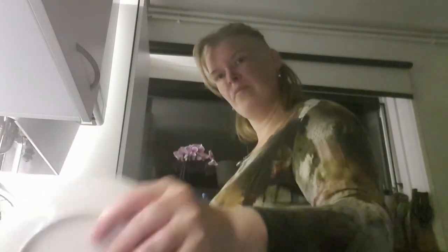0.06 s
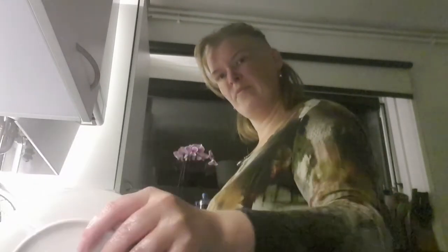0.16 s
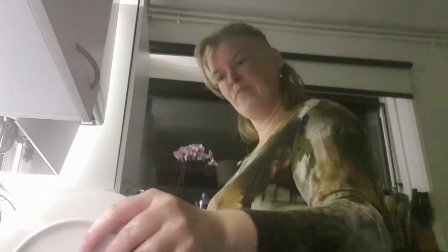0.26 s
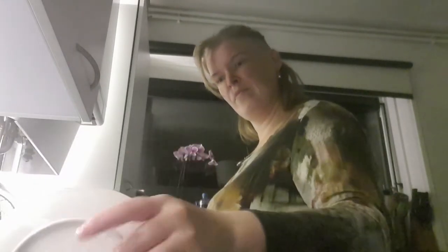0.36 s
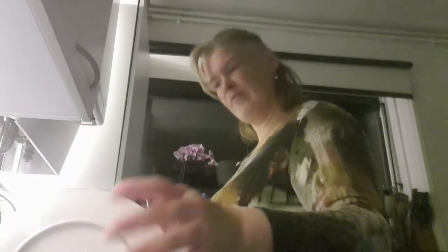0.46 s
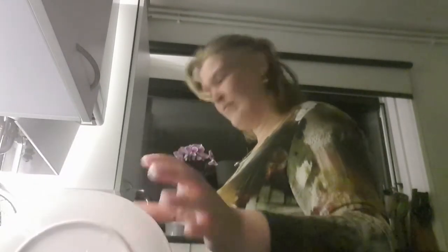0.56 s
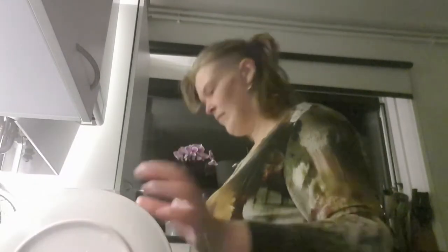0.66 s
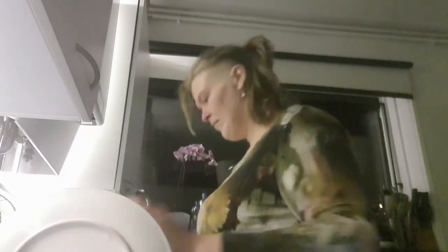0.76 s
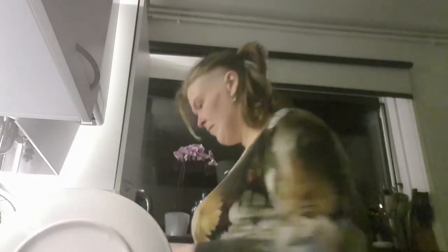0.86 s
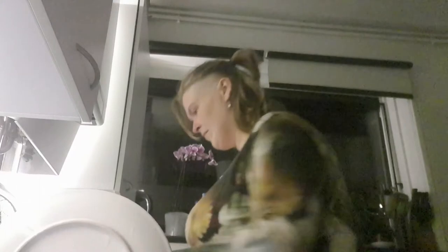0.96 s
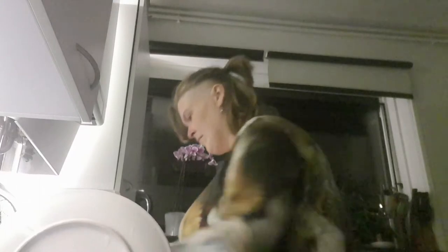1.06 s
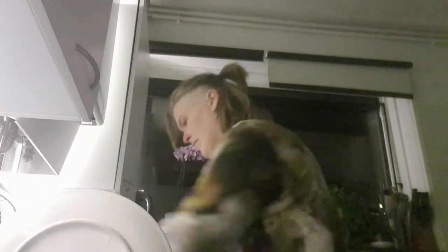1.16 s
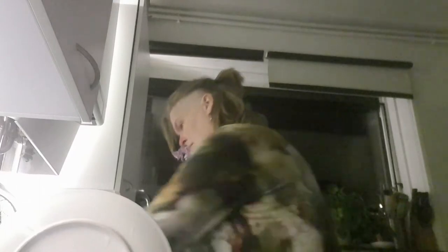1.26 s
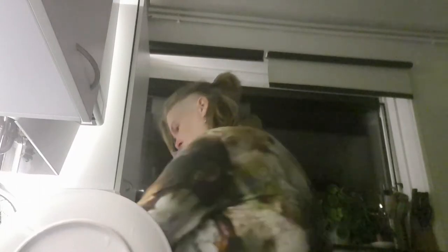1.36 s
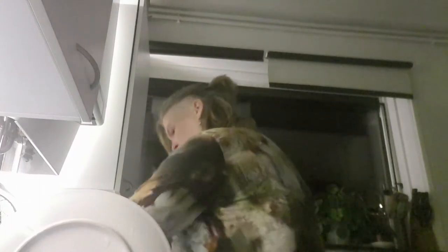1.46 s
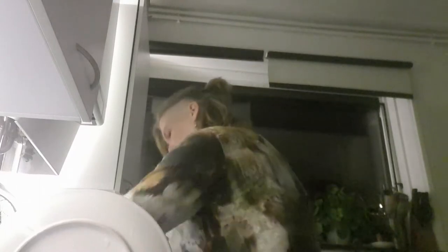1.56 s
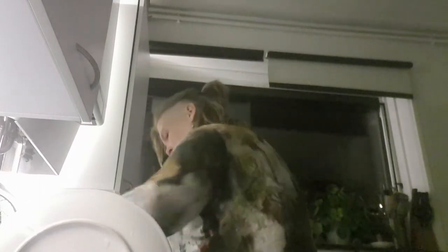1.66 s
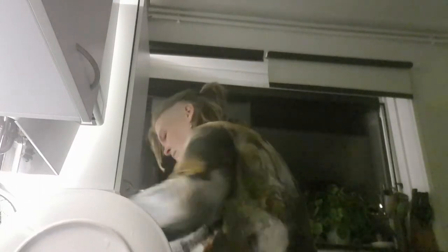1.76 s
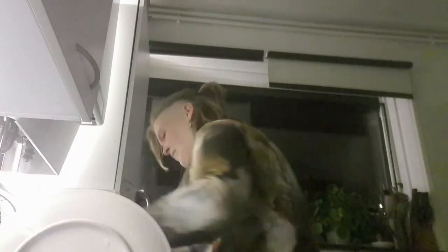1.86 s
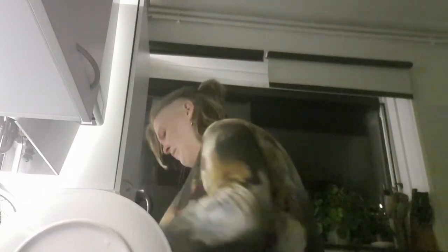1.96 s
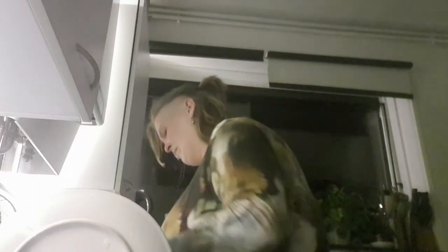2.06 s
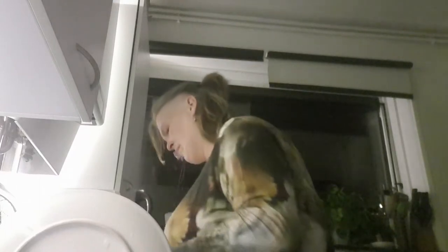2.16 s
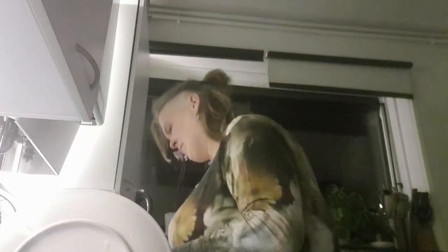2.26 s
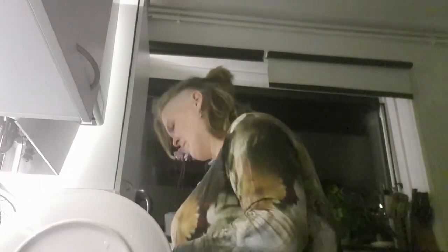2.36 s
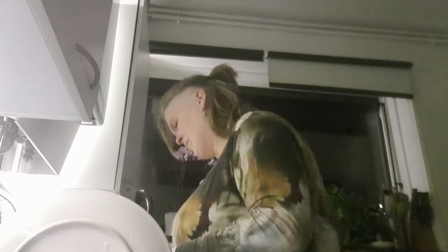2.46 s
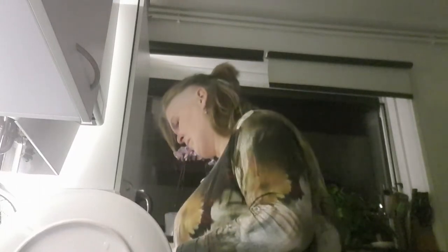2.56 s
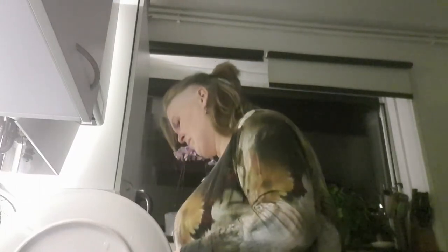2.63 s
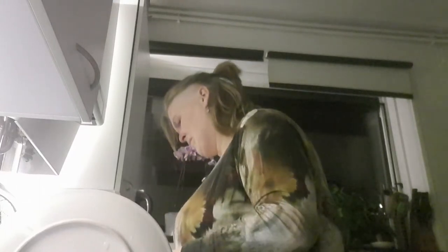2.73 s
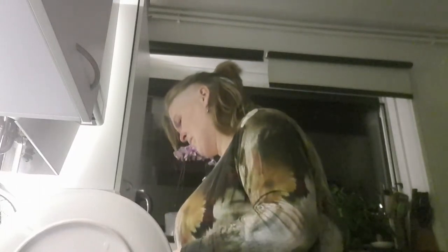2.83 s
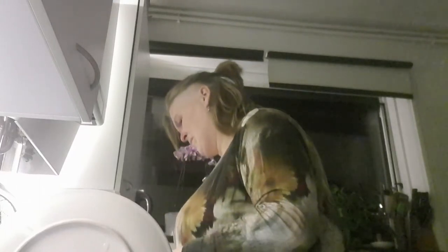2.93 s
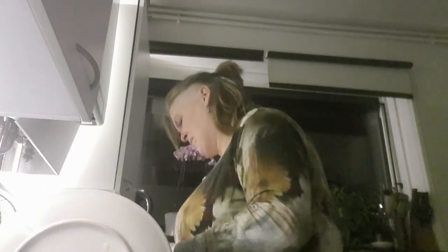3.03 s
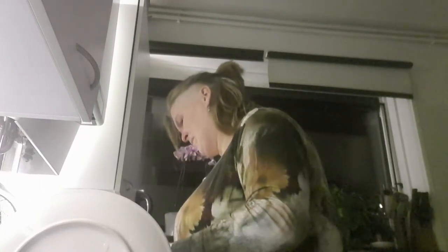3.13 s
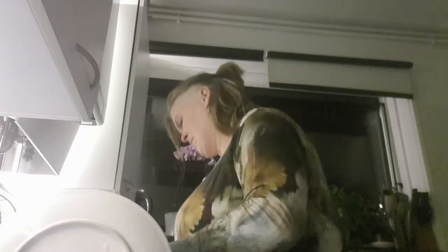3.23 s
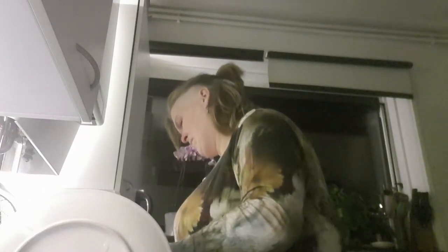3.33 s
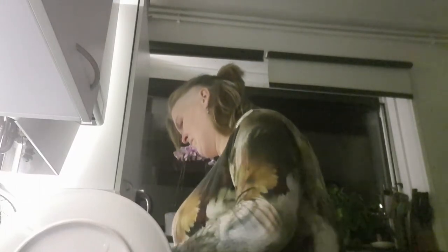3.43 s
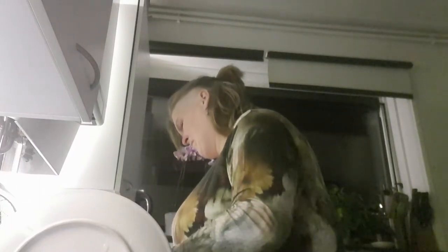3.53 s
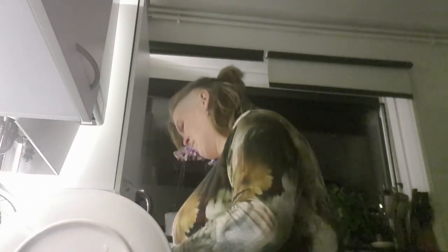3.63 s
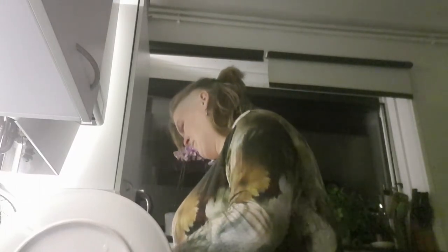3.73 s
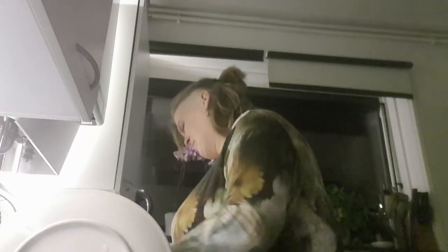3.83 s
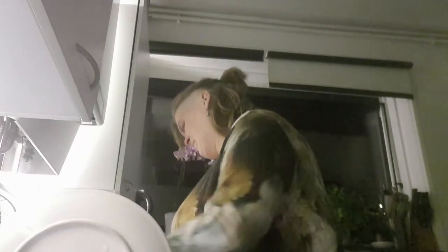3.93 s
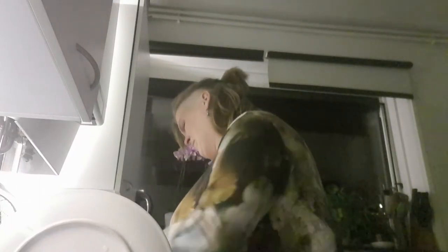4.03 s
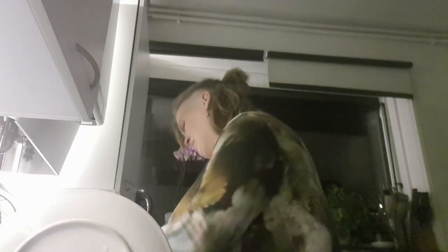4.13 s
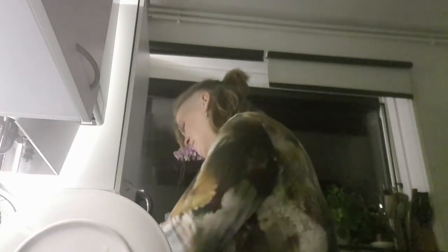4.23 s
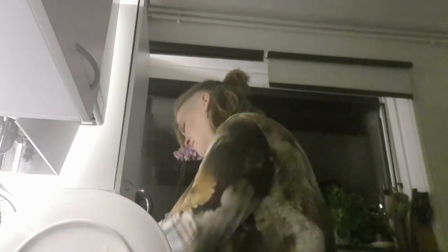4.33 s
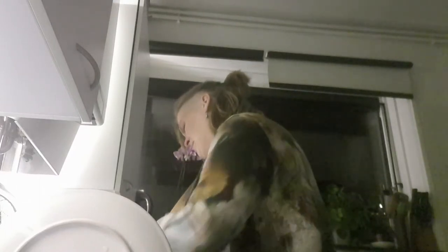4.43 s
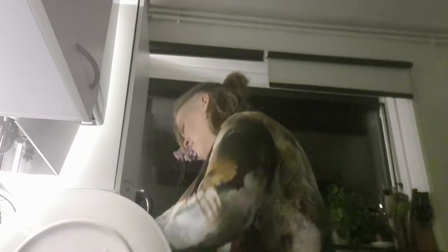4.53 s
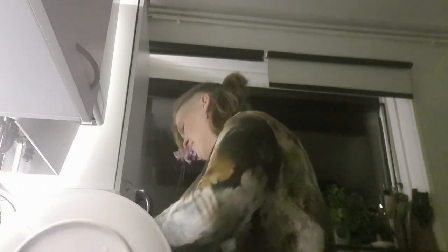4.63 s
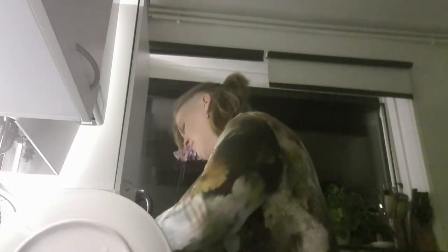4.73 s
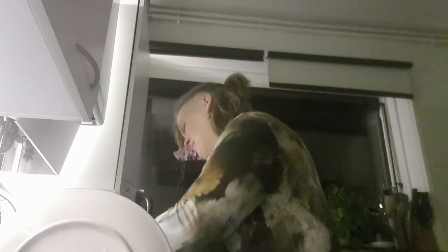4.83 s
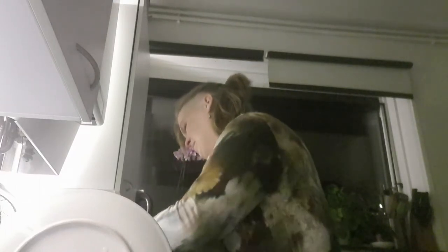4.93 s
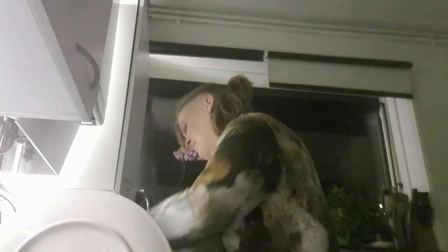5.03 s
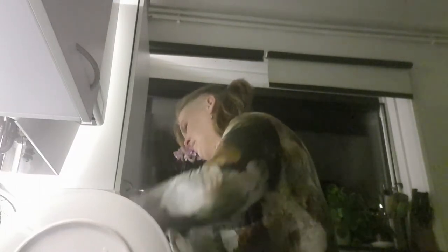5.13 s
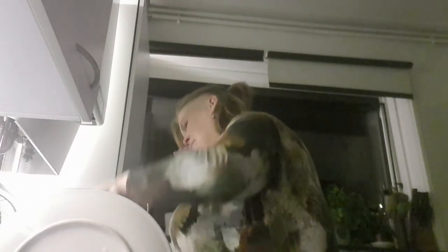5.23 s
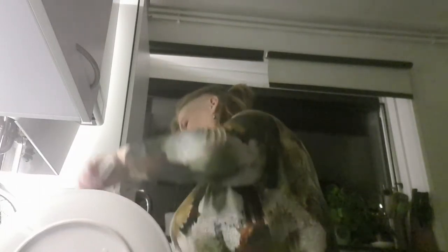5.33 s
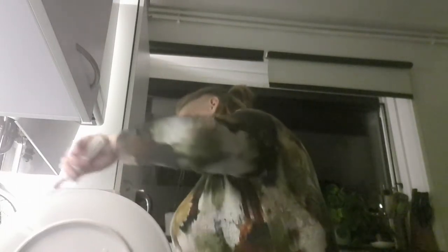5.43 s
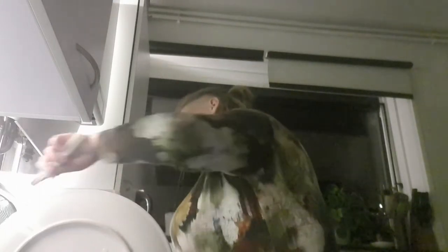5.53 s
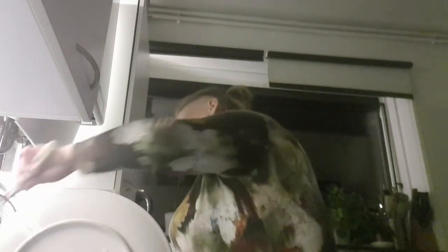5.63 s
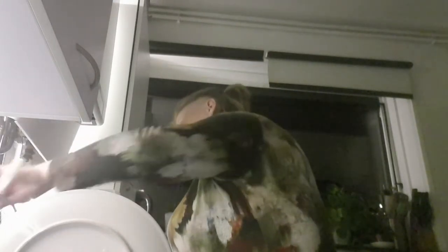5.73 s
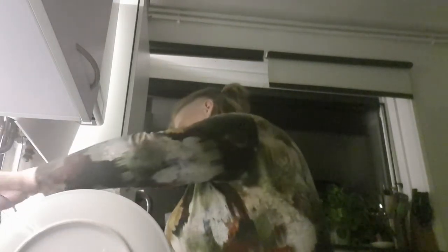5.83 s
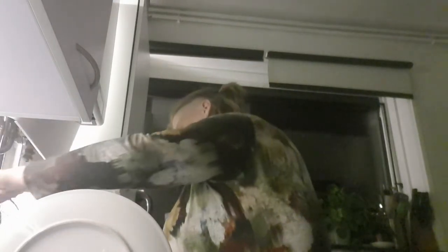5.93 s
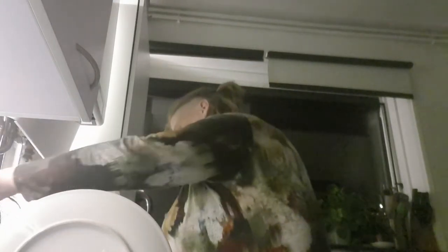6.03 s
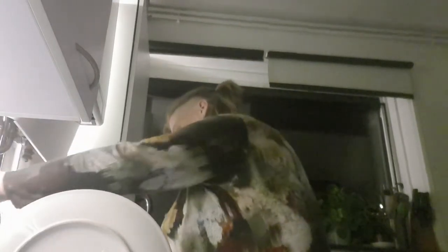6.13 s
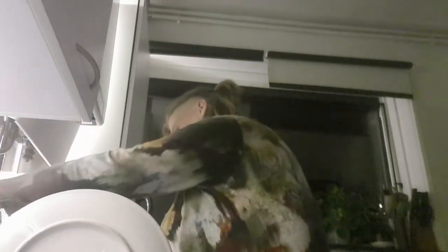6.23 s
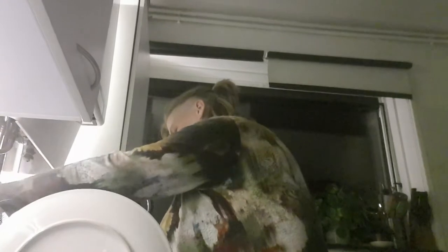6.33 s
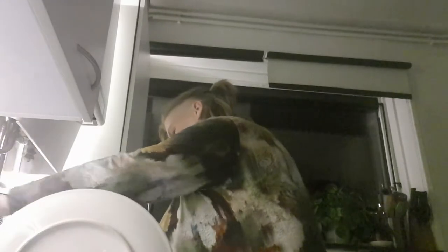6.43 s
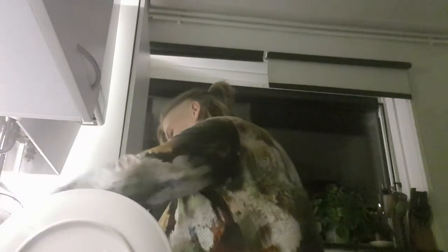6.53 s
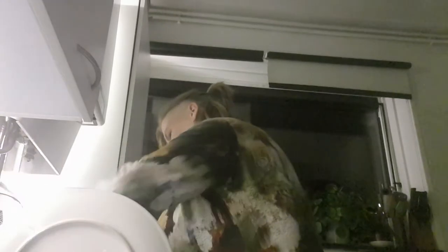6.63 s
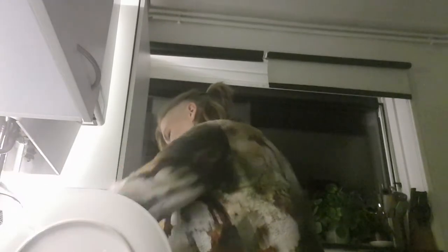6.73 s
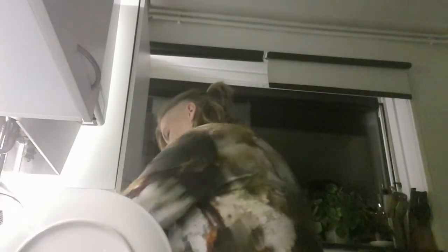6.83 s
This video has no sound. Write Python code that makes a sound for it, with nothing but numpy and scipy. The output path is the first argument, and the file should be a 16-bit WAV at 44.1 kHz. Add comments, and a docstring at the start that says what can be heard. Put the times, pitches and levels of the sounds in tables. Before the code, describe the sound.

A plate clacks into a drying rack, hands slosh and knock dishes in a steel sink, then cutlery clatters into a basket.

```python
"""A plate clacks into a drying rack close by, and the rack thumps and sways in a small, hard-walled kitchen.
Then hands slosh and splash in a steel sink: droplets spray, trapped air glugs and foam fizzes, while
dishes knock the basin into ringing, boom over its floor and groan as they stick and slip.
Near the end a piece of cutlery clashes into the rack's hollow basket and one more utensil clinks."""
import sys
import numpy as np
from scipy import signal
from scipy.fft import rfft, irfft, next_fast_len
from scipy.io import wavfile
from scipy.ndimage import uniform_filter1d

SR = 44100
rng = np.random.default_rng(int(sys.argv[2]) if len(sys.argv) > 2 else 0)


def generate_wav(sig):
    """Save sig (samples, or channels by samples) to the path in sys.argv[1] as 16-bit PCM at SR."""
    pcm = np.round(np.clip(np.atleast_2d(sig).T, -1, 1) * 32767).astype(np.int16)
    wavfile.write(sys.argv[1], SR, pcm)


N = 303849
HANDS_IN_S, HANDS_OUT_S = 1.33, 5.6  # the hands are in the sink between these times
STROKE_RISE_S, STROKE_FALL_S = 0.015, 0.018  # a stroke gathers speed; the water settles

# left-right likeness of diffuse sound: f/Hz, correlation
STEREO_LIKENESS = [(50, 0.98), (300, 0.94), (600, 0.51), (1000, 0.12), (1800, 0), (16000, 0.07)]
# drops running off hands and dishes: t/s, level/dB
RUNOFF = [(1.9, -59), (2.1, -54.5), (2.28, -50), (3.2, -52), (3.5, -53), (3.66, -49.5), (3.75, -46),
          (3.98, -52), (4.12, -56.5), (4.45, -58), (4.65, -46.5), (4.85, -56), (5.06, -56.5), (5.25, -57.5),
          (5.55, -52)]
# colour of spraying water: f/Hz, level/dB
SPRAY_EQ = [(200, -11), (500, 8), (900, -10), (1500, -0.5), (2600, 2), (3800, 4.5), (5500, 5), (7000, 3.5),
            (10000, 5), (13000, 5.5), (15700, 6.5), (16400, -25)]
# colour of air churned under water: f/Hz, level/dB
GURGLE_EQ = [(350, -27.5), (550, 7), (750, 5), (1000, 0), (1500, 8), (2200, 4.5), (3200, 9), (6000, 2)]
# colour of a hard crockery clack: f/Hz, level/dB
CLACK_EQ = [(100, -55), (500, -5), (1100, -1.5), (1600, 4), (2400, -0.5), (3000, -6), (4000, -15),
            (5200, -9), (7500, -13), (15000, -21)]
# colour of a dull knock: f/Hz, level/dB
KNOCK_EQ = [(100, -5), (350, 0), (700, 3), (1200, -8.5), (2200, -14), (4000, -18), (8000, -25),
            (15000, -36)]
# colour of steel on steel: f/Hz, level/dB
CLASH_EQ = [(150, -6.5), (280, 6.5), (600, -5), (900, 2), (1150, -5), (1450, 6), (1750, -8), (2100, -1),
            (3000, -4.5), (5000, -0.5), (6500, -3), (9000, -3), (12500, 3), (16000, -8)]
# colour of a utensil shivering against its neighbours: f/Hz, level/dB
UTENSIL_EQ = [(150, -14), (450, -14), (650, 4), (1000, -12), (1350, -14), (1750, 2.5), (2150, -2),
              (2400, -5), (2870, 3.5), (3300, -1.5), (3850, 0), (4400, -13), (5300, -3), (6500, -21),
              (9000, -15), (15000, -24)]


def amp(db):
    """Decibels to gain."""
    return 10 ** (np.asarray(db) / 20)


def curve_at(points, hz):
    """A curve interpolated on a log-frequency axis."""
    f, value = np.transpose(points)
    return np.interp(np.log(hz + 1), np.log(f + 1), value)


def unit_rms(x):
    """Scaled to rms 1."""
    return x / np.sqrt(np.mean(x ** 2) + 1e-20)


def at_level(x, db):
    """Scaled so that the loudest 10 ms of the mono sum have the given level."""
    return x * amp(db) / np.sqrt(uniform_filter1d(x.mean(0) ** 2, SR // 100).max() + 1e-20)


def add(mix, s, sound):
    """Mixes a stereo sound in at time s."""
    part = mix[:, max(round(s * SR), 0):][:, :sound.shape[1]]
    part += sound[:, :part.shape[1]]


def colour(x, spectrum):
    """Minimum-phase EQ with the given spectrum."""
    log_gain = np.log(amp(curve_at(spectrum, abs(np.fft.fftfreq(2048, 1 / SR)))))
    taps = np.fft.ifft(np.exp(np.conj(signal.hilbert(log_gain)))).real
    return signal.oaconvolve(x, taps[:len(taps) // 2])[:len(x)]


def wander(per_s, shape=N):
    """Random drift of rms 1 that changes about per_s times a second."""
    return unit_rms(uniform_filter1d(rng.standard_normal(shape), SR // per_s))


def effort(start, length, rise, fall):
    """A movement builds up, holds and dies away."""
    age = np.maximum(np.arange(N) / SR - start, 0)
    return np.minimum(age / rise, 1) * np.exp(-np.maximum(age - length, 0) / fall)


def ring(modes, scatter=0.0074):
    """Dying sines; each blow lands elsewhere and excites them a little differently."""
    t = np.arange(SR // 2) / SR
    hz, db, t60 = np.transpose(modes)[:, :, None]
    detune, side = rng.standard_normal((2, len(modes), 1))
    partials = np.sin(2 * np.pi * hz * (1 + scatter * detune) * t)
    return (np.sign(side) * amp(db - 60 * t / t60) * partials).sum(0)


def struck(modes, hz, db_per_octave):
    """Modes near the pitch of a blow take most of it."""
    return [(f, db - db_per_octave * abs(np.log2(f / hz)), t60) for f, db, t60 in modes]


def crack(spectrum, decay_s):
    """The contact itself: a few milliseconds of coloured noise."""
    t = np.arange(SR // 8) / SR
    return colour(rng.standard_normal(len(t)) * np.exp(-t / decay_s), spectrum)


def clicks(count, per_s, spread_db):
    """Random clicks; a positive spread makes a few stand out, a negative one makes a few recede."""
    chance, size, sign = rng.random(count), rng.exponential(1, count), rng.choice([-1, 1], count)
    return (chance < per_s / SR) * sign * amp(spread_db * np.minimum(size, 4))


def kitchen(x, wet_db, near_db=5, near_decay_s=0.0031, left_lag_samples=10):
    """Direct sound reaches the right side first; close surfaces and then the walls throw it back."""
    # reverb time of the room: f/Hz, t60/s
    reverb_time = [(100, 0.58), (300, 0.36), (700, 0.37), (2500, 0.3), (6000, 0.31), (11000, 0.28),
                   (16000, 0.032)]
    hz = np.fft.rfftfreq(256, 1 / SR)
    frame_s = np.arange(240)[:, None] * 128 / SR
    a, b, c, d = rng.standard_normal((4, len(frame_s), len(hz)))
    same = curve_at(STEREO_LIKENESS, hz)
    left = a + 1j * b
    right = same * left + np.sqrt(1 - same ** 2) * (c + 1j * d)
    spectra = np.array([left, right]) * amp(-60 * frame_s / curve_at(reverb_time, hz))
    response = signal.istft(spectra.transpose(0, 2, 1), nperseg=256)[1]
    t = np.arange(response.shape[1]) / SR
    response *= (1 + amp(near_db) * np.exp(-t / near_decay_s)) * (1 - np.exp(-t / 0.0018))
    response *= amp(wet_db) / np.linalg.norm(response[0])
    response[0, left_lag_samples] += 1
    response[1, 0] += 1
    return signal.fftconvolve(x[None], response, axes=1)[:, :N]


def patter(spectrum, per_s, spread_db, places=4):
    """Tiny wet clicks at several places around the sink, each place with its own echoes."""
    spots = (colour(clicks(N, per_s / places, spread_db), spectrum) for _ in range(places))
    return unit_rms(sum(kitchen(spot, wet_db=7) for spot in spots))


def room_tone(air_db=-48.5, fade_db_per_s=1.02, hum_hz=121, hum_db=-67):
    """Soft room noise that slowly sinks, and a faint hum."""
    # colour of the quiet kitchen: f/Hz, level/dB
    air_eq = [(30, -15.5), (55, -0.5), (85, -17), (125, -8), (165, -23.5), (300, -17), (600, -20.5),
              (1100, -29), (1800, -32), (2500, -38.5), (3400, -33.5), (6000, -38.5), (12000, -33),
              (16000, -36)]
    hz = np.fft.rfftfreq(N, 1 / SR)
    a, b = rfft(rng.standard_normal((2, N)))
    same = curve_at(STEREO_LIKENESS, hz)
    air = irfft(np.array([a, same * a + np.sqrt(1 - same ** 2) * b]) * amp(curve_at(air_eq, hz)), N)
    hum = unit_rms(irfft(b / (1 + ((hz - hum_hz) / 3) ** 2), N))
    return amp(air_db - fade_db_per_s * np.arange(N) / SR) * unit_rms(air) + amp(hum_db) * hum


def foam_fizz(level_db=-66):
    """Foam collapses in clumps with a fine, very high fizz."""
    fizz_eq = [(1000, -45), (6000, -42), (12000, 18), (16000, -15)]  # f/Hz, level/dB
    fizz = colour(clicks(N, per_s=120, spread_db=7), fizz_eq) * amp(4 * wander(8))
    return amp(level_db) * unit_rms(kitchen(fizz, wet_db=4))


def suds(base_db=-61.5, growth_db_per_s=0.85):
    """Whipped-up suds crackle as tiny bubbles burst, louder while water runs off the hands."""
    # colour of the crackle: f/Hz, level/dB
    suds_eq = [(800, -15), (1800, -4.5), (2800, -0.5), (4200, 0), (6000, -2), (9000, -7), (16000, -4.5)]
    t = np.arange(N) / SR
    age = np.maximum(t - HANDS_IN_S, 0)
    runoff_db = np.interp(t, *np.transpose(RUNOFF))
    level_db = base_db + growth_db_per_s * age + runoff_db - runoff_db.mean()
    return np.minimum(age / STROKE_RISE_S, 1) * amp(level_db) * patter(suds_eq, per_s=1500, spread_db=2)


def foam_pops(per_s=45, pitches=16, cycles=4, over_runoff_db=-7):
    """Single larger foam bubbles tick at high pitches, their level following the run-off."""
    t = np.arange(SR // 100) / SR
    pops = np.zeros(N)
    for hz in np.geomspace(6500, 14000, pitches):
        pop = np.exp(-t * hz / cycles) * np.sin(2 * np.pi * hz * t)
        pops += signal.oaconvolve(clicks(N, per_s / pitches, spread_db=3), pop)[:N]
    washing = effort(HANDS_IN_S, HANDS_OUT_S - HANDS_IN_S, STROKE_RISE_S, fall=0.37)
    runoff_db = np.interp(np.arange(N) / SR, *np.transpose(RUNOFF))
    return amp(runoff_db + over_runoff_db) * washing * unit_rms(kitchen(pops, wet_db=-1))


def drips(decay_s=0.0089, glide=0.08):
    """A drop pops and traps a tiny bubble that pings with a rising pitch."""
    # single drips and bursting bubbles: t/s, level/dB, f/Hz
    drops = [(0.29, -53, 5830), (0.517, -49, 8120), (0.6537, -52, 6100), (0.7507, -52, 12800),
             (0.852, -52, 12700), (0.8953, -50, 11900), (1.2346, -53, 11100), (1.7036, -45, 1980),
             (4.7057, -45.5, 3350), (5.3567, -58, 14900)]
    out = np.zeros((2, N))
    t = np.arange(SR // 25) / SR
    for s, db, hz in drops:
        ping = np.exp(-t / decay_s) * np.sin(2 * np.pi * hz * t * (1 + glide * np.tanh(t / decay_s)))
        pop = np.exp(-t * hz / 2.7) * np.sin(2 * np.pi * hz * t)
        add(out, s, at_level(kitchen(0.35 * ping + 8.8 * pop, wet_db=1.5), db))
    return out


def bubbles(per_s, low_hz=250, high_hz=1100, cycles=6, glide=0.095, pitches=24):
    """Pockets of air ring briefly, rising in pitch as they near the surface."""
    t = np.arange(SR // 10) / SR
    out = np.zeros(N)
    for hz in np.geomspace(low_hz, high_hz, pitches):
        age = t * hz / cycles
        starts = np.zeros(N)
        when, softness = rng.random((int(per_s * N / SR / pitches), 2)).T
        starts[(when * (N - 1)).astype(int)] = amp(-12 * softness)
        blip = np.exp(-age) * np.sin(2 * np.pi * hz * t * (1 + glide * np.tanh(age)))
        out += signal.oaconvolve(starts, blip)[:N]
    return unit_rms(out)


def water(lap_db=-63.5, bubbling_db=-65, calm_db_per_s=1.5, spray_over_gurgle_db=6):
    """Each stroke pushes the water and churns bubbles and spray; in between it laps and drops patter."""
    # strokes of the hands: t/s, length/s, slosh/dB, gurgle of air drawn under/dB
    strokes = [(1.376, 0.18, -51.5, -45), (1.673, 0.12, -51, -50), (2.537, 0.17, -52, -59.5),
               (2.776, 0.3, -53, -58.5), (3.665, 0.11, -71, -59), (3.802, 0.093, -57.5, -54),
               (4.206, 0.15, -55.5, -67), (4.556, 0.3, -60, -84)]
    # colour of sloshing water: f/Hz, level/dB
    slosh_eq = [(45, -5.5), (65, 4.5), (90, -6), (120, 9.5), (170, -9), (280, 2), (410, 5.5), (520, -6.5),
                (650, 3), (850, -19.5), (1500, -22.5), (4000, -35)]
    t = np.arange(N) / SR
    astir = effort(HANDS_IN_S, HANDS_OUT_S - HANDS_IN_S, STROKE_RISE_S, fall=0.3)
    calming = astir * amp(-calm_db_per_s * (t - HANDS_IN_S))
    pushed, churned = amp(lap_db) * calming, amp(bubbling_db) * calming
    for s, length, slosh_db, gurgle_db in strokes:
        stroke = effort(s, length, STROKE_RISE_S, STROKE_FALL_S)
        pushed = np.hypot(pushed, amp(slosh_db) * stroke)
        churned = np.hypot(churned, amp(gurgle_db) * stroke)
    runoff = astir * amp(np.interp(t, *np.transpose(RUNOFF)))
    sprayed = np.hypot(runoff, amp(spray_over_gurgle_db) * churned)
    clumps = amp(1.2 * wander(25))  # drops fall in bunches
    spray = patter(SPRAY_EQ, per_s=1400, spread_db=3) * clumps * sprayed
    froth = bubbles(per_s=420, low_hz=565.5, high_hz=3780, cycles=6.3)
    gurgle = unit_rms(colour(froth, GURGLE_EQ)) * churned
    surge = unit_rms(colour(clicks(N, per_s=350, spread_db=-0.5), slosh_eq))
    slosh = (surge + 0.32 * unit_rms(colour(bubbles(per_s=130), slosh_eq))) * pushed
    return spray + kitchen(gurgle + slosh, wet_db=7)


def glugs(cycles=5, glide=0.056, rise_s=0.0033):
    """A big bubble rings for a few cycles, its pitch rising as it surfaces."""
    # air escaping from under the dishes: t/s, level/dB, f/Hz
    air_pockets = [(1.388, -37.5, 850), (1.43, -41, 690), (1.472, -41, 780), (1.51, -46, 714),
                   (1.555, -44, 670), (1.715, -50, 680), (1.757, -39.5, 1240), (2.44, -40, 1198),
                   (2.996, -50, 620), (3.044, -42, 864), (3.482, -51, 740), (3.705, -49, 900),
                   (3.833, -40.5, 575), (4.024, -39, 718)]
    out = np.zeros((2, N))
    t = np.arange(SR // 8) / SR
    for s, db, hz in air_pockets:
        age = t * hz / cycles
        turns = np.cumsum(hz * (1 + glide * (np.tanh(age) - 0.5))) / SR
        glug = (1 - np.exp(-t / rise_s)) * np.exp(-age) * np.sin(2 * np.pi * turns)
        add(out, s, at_level(kitchen(glug, wet_db=-2.5), db))
    return out


def splashes(usual_db=-38, usual_rise_s=0.002):
    """A cloud of droplets swells and thins out over a lower gulp of trapped air."""
    # splashes: t/s, spray/dB, time to full spray/s
    cues = [(1.329, -42.5, 0.0045), (1.38, -40, 0.0039), (1.468, -32, 0.0041), (1.548, -37, 0.0071),
            (1.619, -29.5, 0.0056), (1.881, -41, 0.002), (2.241, -39, 0.001), (2.44, -36, 0.00065),
            (2.595, -36.5, 0.0011), (2.837, -32.5, 0.00035), (3.04, -39.5, 0.0024), (3.1227, -31, 0.00096),
            (3.381, -34, 0.0015), (3.559, -38.5, 0.001), (3.688, -46.5, 0.0052), (3.93, -50.5, 0.0015),
            (3.998, -44, 0.00091), (4.507, -49.5, 0.0073), (4.642, -50.5, 0.0011), (5.164, -47, 0.008)]
    out = np.zeros((2, N))
    t = np.arange(SR // 4) / SR
    for s, spray_db, rise_s in cues:
        # slower and bigger splashes trap more air
        trapped_db = -6.5 + 2.5 * np.log2(rise_s / usual_rise_s) + 0.49 * (spray_db - usual_db)
        swell = np.sqrt(t / rise_s) * np.exp(-t / rise_s / 2)
        cloud = colour(clicks(len(t), per_s=3800, spread_db=-2) * swell, SPRAY_EQ)
        gulp = colour(clicks(len(t), per_s=2000, spread_db=3.5) * swell, GURGLE_EQ)
        add(out, s, at_level(kitchen(cloud, wet_db=8, near_db=5.5), spray_db))
        add(out, s, at_level(kitchen(gulp, wet_db=7.5), spray_db + trapped_db))
    return out


def scuffs():
    """A scrubbed dish catches, and a quick run of tiny slips ticks through it."""
    # scuffs: t/s, level/dB, fade/s
    cues = [(1.704, -38, 0.017), (2.555, -46, 0.0092), (2.596, -48, 0.0066), (2.802, -45, 0.013),
            (2.958, -45.5, 0.012), (3.827, -53, .03), (4.027, -46.5, 0.018), (4.164, -48, 0.0043),
            (4.333, -51.5, 0.005)]
    # colour of the scrubbed dish: f/Hz, level/dB
    scuff_eq = [(300, -21), (800, -10), (1050, -11), (1400, 2.5), (1750, -6.5), (2150, 0.5), (2500, -7.5),
                (3700, -13), (6000, -18.5), (15000, -38)]
    out = np.zeros((2, N))
    t = np.arange(SR // 6) / SR
    for s, db, fade_s in cues:
        slips = clicks(len(t), per_s=900, spread_db=3) * np.exp(-t / fade_s)
        add(out, s, at_level(kitchen(colour(slips, scuff_eq), wet_db=2.5), db))
    return out


def drags():
    """A dragged dish sets the thin floor of the sink booming with a run of small jolts."""
    # drags: t/s, length/s, level/dB
    cues = [(2.464, 0.042, -42), (2.672, 0.042, -41.5), (2.89, 0.06, -41), (3.85, 0.092, -38),
            (4.157, 0.033, -43), (4.23, 0.043, -34)]
    # modes of the sink's floor: f/Hz, level/dB, t60/s
    floor_modes = [(63.7, -10, 0.27), (116, -4, 0.24), (179, -3, 0.066), (225, -5.5, 0.11)]
    out = np.zeros((2, N))
    t = np.arange(SR // 8) / SR
    for s, length, db in cues:
        jolts = clicks(len(t), per_s=300, spread_db=1.5) * (t < length)
        jolts[0] = 1
        boom = signal.oaconvolve(jolts, ring(floor_modes))
        add(out, s, at_level(kitchen(boom, wet_db=-10.5), db))
    return out


def rubs(waver=0.042, rough_db=5.5, rise_s=0.0047, fall_s=0.0041):
    """A wet dish sticks and slips: an unsteady tone that holds while the hand pushes."""
    # groans and squeaks: t/s, length/s, level/dB, first f/Hz, last f/Hz
    cues = [(2.564, 0.034, -34, 427, 395), (2.642, 0.1, -33, 410, 390), (2.893, 0.022, -33, 419, 382),
            (2.961, 0.014, -28.5, 410, 463), (5.221, 0.0142, -43.5, 2050, 2220),
            (5.321, 0.036, -57, 1870, 1870)]
    out = np.zeros((2, N))
    t = np.arange(SR // 8) / SR
    for s, length, db, first_hz, last_hz in cues:
        drift, grip = wander(400, (2, len(t)))
        hz = np.interp(t, [0, length], [first_hz, last_hz]) * (1 + waver * drift)
        tone = np.sin(2 * np.pi * np.cumsum(hz) / SR) * amp(rough_db * grip)
        push = np.minimum(t / rise_s, 1) * np.exp(-np.maximum(t - length, 0) / fall_s)
        add(out, s, at_level(kitchen(tone * push, wet_db=-7.5), db))
    return out


def basin_knocks(usual_db=-32, usual_hz=400, band_ratio=1.6, damping_s=0.025):
    """A blow cushioned by water pushes the steel basin and rings it; water stops deeper blows sooner."""
    # dishes bump the basin: t/s, level/dB, centre of the blow/Hz, relative ring/dB
    bumps = [(1.627, -26.5, 390, -8), (1.758, -29.5, 428, -12), (1.8798, -33, 606, 2),
             (2.24, -41, 756, -10), (2.44, -40.5, 453, 6), (2.553, -39, 477, 1), (2.595, -39, 560, 2),
             (2.799, -35, 420, 8), (2.844, -34, 480, -7), (2.955, -40, 610, 3), (3.042, -27, 670, -23.5),
             (3.077, -40, 380, 2), (3.124, -36, 710, 2), (3.3784, -31.5, 870, -1), (3.383, -27.5, 650, -2),
             (3.56, -37, 760, -21), (3.866, -40, 554, -15), (3.909, -35.5, 333, -12),
             (4.022, -31.5, 455, 5), (4.163, -31.5, 430, 11), (4.223, -25.5, 405, 7),
             (4.233, -28.5, 340, -2), (4.2828, -17.5, 398, -20.5), (4.334, -39, 645, -14),
             (4.558, -32, 460, 0), (4.635, -38, 363, 20), (4.802, -51, 335, 8), (4.873, -43, 388, 4),
             (6.18, -46, 326, -7), (6.88, -38.5, 373, 0.5)]
    # modes of the filled basin: f/Hz, level/dB, t60/s
    basin_modes = [(116, -4, 0.4), (279, 3, 0.42), (333, -2.5, 0.27), (395.6, 5.5, 0.36), (451, -10, 0.23),
                   (520, -6.5, 0.18), (610.7, 3.5, 0.3), (675, 2, 0.38), (730, 7, 0.31), (810, -4, 0.1),
                   (941, 8, 0.12), (1122, 9, 0.06), (1172, 9.5, 0.066), (1530, 11.5, 0.15)]
    out = np.zeros((2, N))
    t = np.arange(SR // 2) / SR
    for s, db, hz, ring_db in bumps:
        ring_s = damping_s * (hz / usual_hz) ** 3
        steel = ring(struck(basin_modes, hz, db_per_octave=6), scatter=0.012) * np.exp(-t / ring_s)
        push = 2 * np.exp(-t / 0.003) * np.sin(2 * np.pi * hz * t)
        body = (amp(ring_db) * steel + push) * (1 - np.exp(-t / 0.0017))
        cushion = signal.butter(1, [hz / band_ratio, hz * band_ratio], "band", fs=SR)
        add(out, s, at_level(kitchen(signal.lfilter(*cushion, body), wet_db=-10, near_db=4), db))
        # stronger and higher blows have more of a hard edge
        edge_db = -43 + 0.8 * (db - usual_db) + 2 * np.log2(hz / usual_hz)
        add(out, s, at_level(kitchen(crack(KNOCK_EQ, 0.0012), wet_db=6.5, near_db=-36), edge_db))
    return out


def crockery():
    """Hard, ringing touches of dish on dish above the water."""
    # touches: t/s, clack/dB, ring/dB
    hits = [(1.7568, -37, -40), (1.8815, -39, -36), (3.379, -35, -34)]
    # modes of the dish: f/Hz, level/dB, t60/s
    dish_modes = [(926, -4, .17), (1160, -9, .12), (1357, -8, .25), (1773, 1, .26), (2160, -7, .19),
                  (2654, -4, .11), (2777, -7, .15), (3634, -9, .19), (4307, -10, .2), (5604, -17, .25)]
    out = np.zeros((2, N))
    for s, clack_db, ring_db in hits:
        add(out, s, at_level(kitchen(ring(dish_modes, scatter=0.001), wet_db=-9), ring_db))
        add(out, s, at_level(kitchen(crack(CLACK_EQ, 0.002), wet_db=2), clack_db))
    return out


def rack_sway(start_hz=58, sag_hz_per_s=6.36, lowest_hz=48, waver=0.069):
    """The loaded rack wobbles with a low drone that sags as it settles."""
    # the hand leans on the rack: t/s, length/s, level/dB
    leans = [(0.0, 0.23, -31), (0.152, 0.15, -34), (0.373, 0.32, -42), (0.763, 1, -53)]
    t = np.arange(N) / SR
    hz = np.maximum(start_hz - sag_hz_per_s * t, lowest_hz) * (1 + waver * wander(12))
    pushes = np.zeros(N)
    for s, length, db in leans:
        swell = np.exp(-4.1 * ((t - s) / length - 0.35) ** 2)
        pushes += amp(db) * effort(s, length, rise=0.0047, fall=0.03) * swell
    return pushes * unit_rms(np.sin(2 * np.pi * np.cumsum(hz) / SR))


def plate():
    """The plate, close to the microphone, clacks into its slot, rings, and thumps the rack."""
    # the plate meets the rack: t/s, clack/dB, ring/dB, dull knock/dB, rack thump/dB
    hits = [(0.0014, -36, -33.5, -53, -35), (0.0445, -26, -37, -44, -26), (0.0682, -40, -25, -24, -54),
            (0.0774, -57, -35, -25.5, -28), (0.1365, -36.5, -38.5, -31, -30.5),
            (0.2354, -70, -59, -39.5, -70), (0.4956, -75, -81.5, -50, -67)]
    # modes of the plate, damped by the hand: f/Hz, level/dB, t60/s
    plate_modes = [(2085, 8, 0.04), (2150, 1, 0.05), (3330, 9, 0.025), (3450, 2, 0.07), (4290, 1, 0.045),
                   (5250, -4, 0.03), (5560, -8, 0.06), (7000, -16, 0.07), (8440, -19, 0.1)]
    # modes of the rack: f/Hz, level/dB, t60/s
    rack_modes = [(62.1, -5, 0.27), (117, 2, 0.12), (190, 1, 0.11), (228, -0.5, 0.081), (315, -4.5, 0.093)]
    out = np.zeros((2, N))
    for s, clack_db, ring_db, knock_db, thump_db in hits:
        add(out, s, at_level(kitchen(crack(CLACK_EQ, 0.0009), wet_db=3, near_db=12), clack_db))
        add(out, s, at_level(kitchen(ring(plate_modes), wet_db=3, near_db=16), ring_db))
        add(out, s, at_level(kitchen(crack(KNOCK_EQ, 0.00073), wet_db=-0.5, near_db=19), knock_db))
        add(out, s, at_level(kitchen(ring(rack_modes), wet_db=-4.5), thump_db))
    return out


def utensil(clash_db=-17, rattle_db=-12):
    """A utensil taps its neighbours once and shivers in a fine, dying rattle."""
    # the tap: t/s, level/dB
    taps = [(6.345, -35)]
    out = np.zeros((2, N))
    t = np.arange(SR // 2) / SR
    for s, db in taps:
        rattle = clicks(len(t), per_s=1000, spread_db=-1) * np.exp(-t / 0.071)
        add(out, s, at_level(kitchen(crack(UTENSIL_EQ, 0.0012), wet_db=2), db))
        add(out, s, at_level(kitchen(crack(CLASH_EQ, 0.0016), wet_db=17), db + clash_db))
        add(out, s, at_level(kitchen(colour(rattle, UTENSIL_EQ), wet_db=14), db + rattle_db))
    return out


def cutlery(pan_right_db=0.5, chatter_db=-13, chatter_s=0.0099, basket_rise_s=0.00083):
    """Steel clashes on steel, rings, chatters and bounces on the hollow floor of the basket."""
    # landing and bounces: t/s, clash/dB, steel ring/dB, basket/dB, centre of the blow/Hz
    hits = [(5.6866, -32.5, -29.5, -38.5, 400), (5.7396, -14, -39, -25, 380),
            (5.7603, -17.5, -40.5, -14.5, 520), (5.7673, -35, -47.5, -17.5, 600),
            (5.7844, -38, -56, -23.5, 560), (5.818, -38, -58, -46, 450), (5.897, -34.5, -48, -36.5, 600),
            (5.9115, -42, -44.5, -30, 855)]
    # modes of the cutlery: f/Hz, level/dB, t60/s
    steel_modes = [(1850, -3, 0.15), (2700, 2, 0.055), (3710, 13, 0.068), (4300, -2, .08), (4520, 14, 0.04),
                   (5330, 10, 0.046), (5830, 1, 0.08), (6200, -6, 0.14), (10300, -12, 0.15),
                   (13900, -13, .18)]
    # modes of the basket: f/Hz, level/dB, t60/s
    basket_modes = [(113.5, -0.5, 0.26), (277, -10, 0.18), (320, -5, 0.16), (373.5, -6, 0.24),
                    (513, -8.5, 0.2), (547, -4.5, 0.22), (588.4, 3, 0.15), (640, 7, 0.088), (698, 1, 0.2),
                    (746, -3, 0.2), (804, -4, 0.095), (889, 0, 0.16), (952, 3, 0.079), (1447, 1.5, 0.066),
                    (1524, 3.5, 0.06), (2600, -3, 0.068)]
    out = np.zeros((2, N))
    t = np.arange(SR // 2) / SR
    for s, clash_db, ring_db, basket_db, hz in hits:
        clash = at_level(kitchen(crack(CLASH_EQ, 0.0018), wet_db=0, near_db=7), clash_db)
        add(out, s, clash * amp([[-pan_right_db], [pan_right_db]]))
        chatter = clicks(len(t), per_s=2100, spread_db=-7) * np.exp(-t / chatter_s)
        add(out, s, at_level(kitchen(colour(chatter, UTENSIL_EQ), wet_db=0.5), clash_db + chatter_db))
        add(out, s, at_level(kitchen(ring(steel_modes), wet_db=1), ring_db))
        hollow = ring(struck(basket_modes, hz, db_per_octave=2.5), scatter=0.0071)
        hollow *= 1 - np.exp(-t / basket_rise_s)
        add(out, s, at_level(kitchen(hollow, wet_db=-9, near_db=10), basket_db))
    return out


def scene():
    """Everything at the sink and the rack, over the room tone."""
    dishes = plate() + rack_sway() + basin_knocks() + rubs() + drags() + crockery() + scuffs()
    steel = utensil() + cutlery()
    dishwater = splashes() + water() + glugs() + suds() + foam_pops() + drips()
    return dishes + steel + dishwater + room_tone() + foam_fizz()


def record(dry, low_cut_hz=36, ceiling=0.86, high_cut_hz=16300):
    """Each side gets its own colour; rumble is cut, peaks round off and the very top is cut."""
    # stereo balance: f/Hz, left minus right/dB
    balance = [(60, 1), (300, 0.3), (700, 3.5), (3000, 3), (8000, 2.5), (12500, 0), (16000, -1.5)]
    size = next_fast_len(N + SR // 10)
    hz = np.fft.rfftfreq(size, 1 / SR)
    left_db = curve_at(balance, hz) / 2
    low_cut = 1 - 1 / (1 + (hz / low_cut_hz) ** 8)
    stereo = irfft(rfft(dry, size) * low_cut * amp([left_db, -left_db]), size)[:, :N]
    rounded = stereo / (1 + (stereo / ceiling) ** 4) ** (1 / 4)
    high_cut = signal.firwin(511, high_cut_hz, window=("kaiser", 9), fs=SR)
    return signal.oaconvolve(rounded, high_cut[None], "same")


dry = scene()
out = record(dry)
generate_wav(out)
```